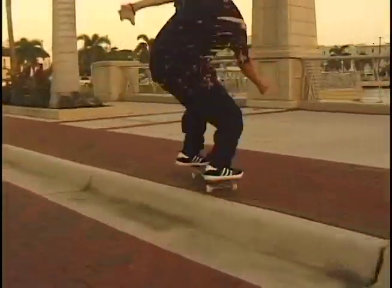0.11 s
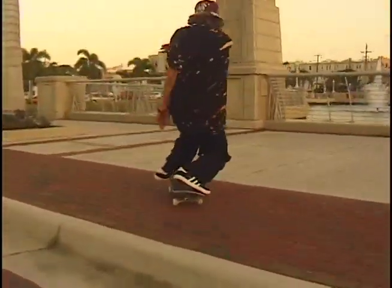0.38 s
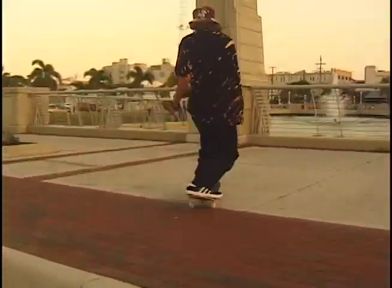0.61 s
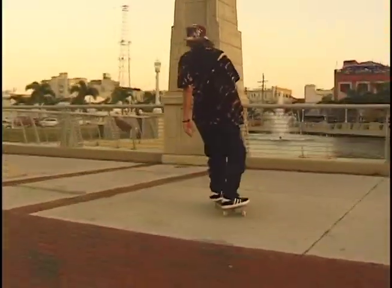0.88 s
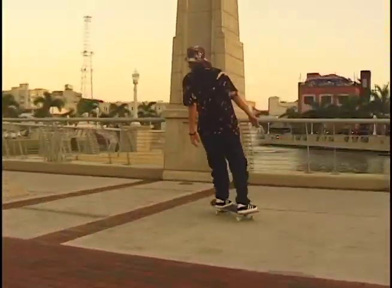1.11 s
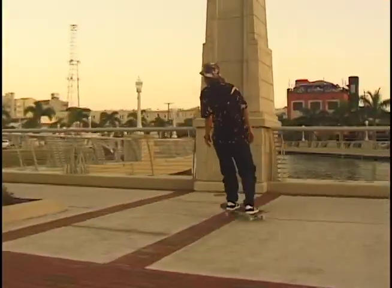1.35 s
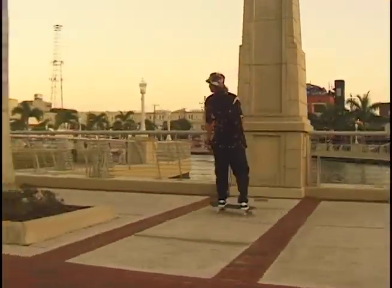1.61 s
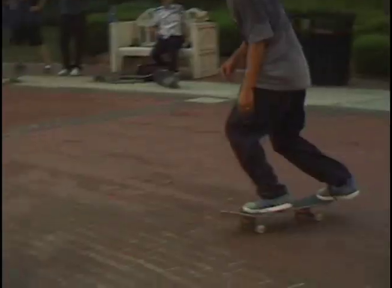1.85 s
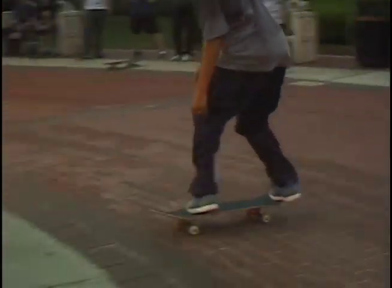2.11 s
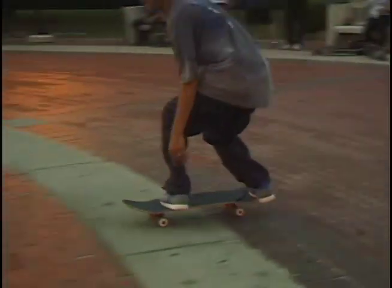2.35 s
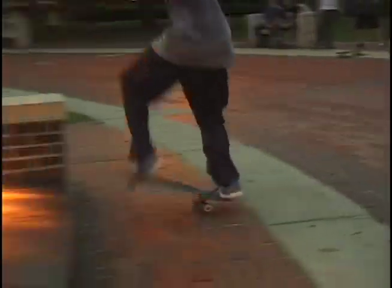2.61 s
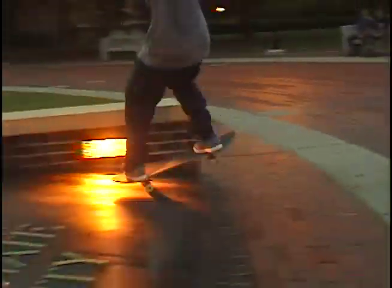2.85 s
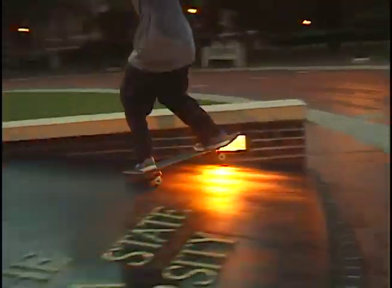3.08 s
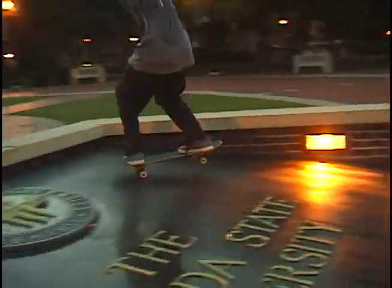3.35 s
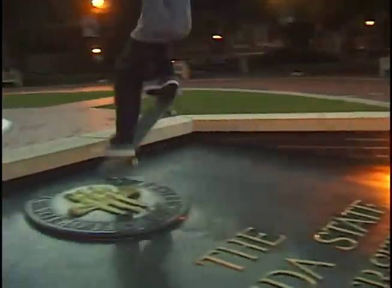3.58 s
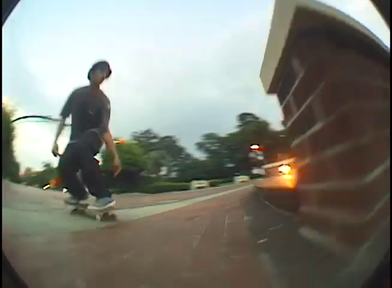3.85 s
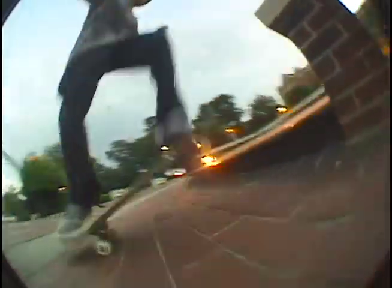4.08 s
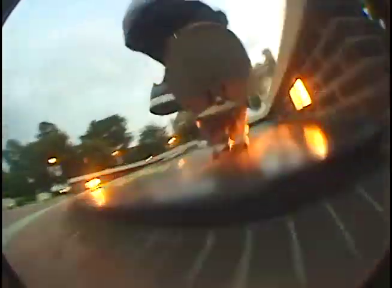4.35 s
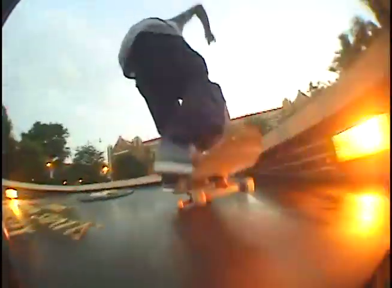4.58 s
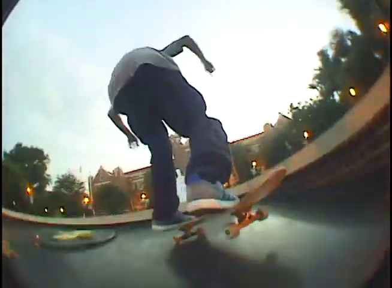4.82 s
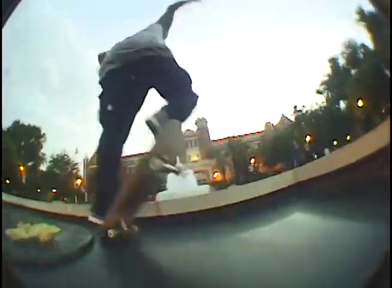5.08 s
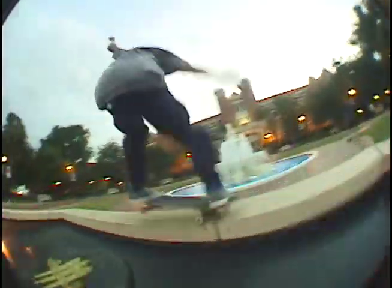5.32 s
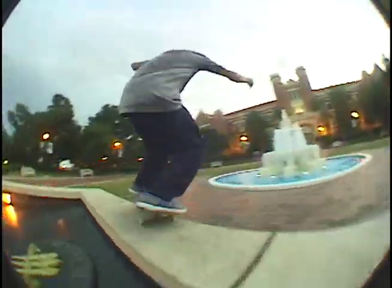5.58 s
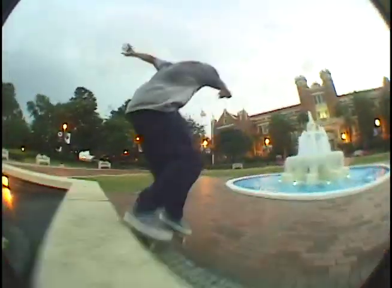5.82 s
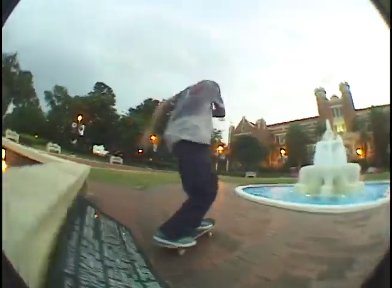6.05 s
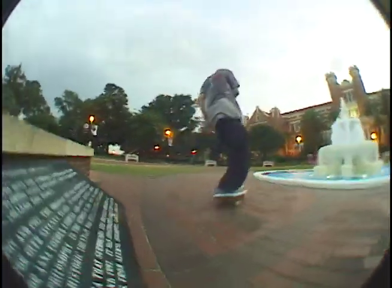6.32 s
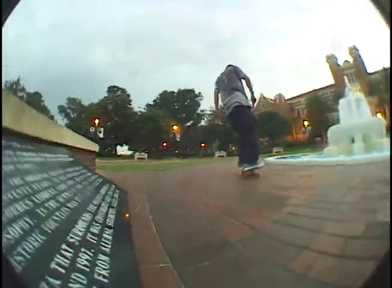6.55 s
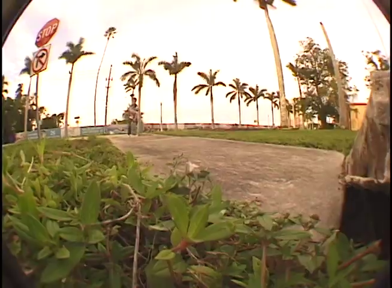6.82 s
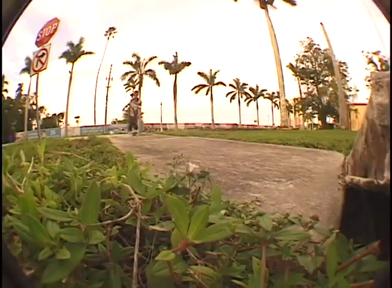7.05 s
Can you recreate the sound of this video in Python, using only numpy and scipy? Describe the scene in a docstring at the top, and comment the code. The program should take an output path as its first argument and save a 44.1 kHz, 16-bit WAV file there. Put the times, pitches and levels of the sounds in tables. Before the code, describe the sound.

Hard wooden skateboard cracks punctuate rolling wheel rumble, seam ticks, rapid brick clatter and short shoe scuffs in an open, lightly windy plaza.

```python
"""Skateboards on a paved square

Wheels rumble on rough ground and knock over joints; tails pop, boards land and shoes scuff. Noise pulses and
damped tones excite the resonances of two decks, the first of which fades into the second. Shaped noise makes
the street, the hissing fountain and the wind that buffets the microphone. The hardest peaks saturate.
Only the last part is in stereo: the board leads on the left, most of the background is partly correlated.
"""
import sys
import numpy as np
from scipy import signal
from scipy.fft import rfft, irfft, next_fast_len
from scipy.io import wavfile
from scipy.ndimage import uniform_filter1d, map_coordinates

SR = 44100
rng = np.random.default_rng(int(sys.argv[2]) if len(sys.argv) > 2 else 0)


def magnitude_from_level(level_db):
    """Linear magnitude for a level in decibels (20 dB per decade)."""
    exponent = np.asarray(level_db, float) / 20
    return 10 ** exponent


def transcribe(signal):
    """Save signal, clipped to [-1, 1], as a 16-bit WAV file at the path in sys.argv[1]."""
    frames = np.atleast_2d(signal).T
    limited = np.clip(frames, -1, 1)
    pcm = np.round(limited * 32767).astype(np.int16)
    wavfile.write(sys.argv[1], SR, pcm)


N = 316638
TIME_S = np.arange(N) / SR

# Levels of separate events are nominal; each layer adds its own offset.
# single deep joints: [t/s, level/dB, knock f/Hz, treble level/dB re the level]
JOINTS = [(1.833, -10.5, 940, -10.5), (1.857, -10, 900, -23), (1.876, -7, 1010, -12.5),
          (1.903, -12, 790, -15), (1.999, -11, 650, -8), (2.278, -8.5, 655, -12), (2.309, -8, 720, -23),
          (1.976, -8.5, 1220, -11.5), (2.067, -19, 930, -0.5), (2.195, -6.5, 787, -12.5),
          (2.226, -9, 746, -13.5), (2.25, -6.5, 680, -30), (2.332, -5.5, 714, -14.5),
          (2.391, -6.5, 930, -7.5), (2.4435, -2.5, 1225, -11), (2.488, -12, 710, -17),
          (2.583, -5.5, 730, -20), (2.646, -18, 640, -17), (3.746, -15.5, 692, -17.5),
          (3.775, -13, 666, -18), (3.797, -12, 643, -10.5), (3.862, -9.5, 837, -19.5),
          (3.916, -3, 718, -20), (3.957, -7, 650, -20.5), (3.983, -13, 695, -6), (3.992, -3.5, 720, -20.5),
          (4.012, -14, 596, -24), (4.035, -13.5, 674, -12), (4.054, -13, 620, -8), (4.062, -8, 584, -23),
          (4.085, -13, 480, -11.5), (4.128, -11, 508, -40), (4.138, -24.5, 517, -8.5)]
# runs over evenly laid bricks: [first t/s, last t/s, first level/dB, last level/dB, knock f/Hz, click level/dB]
BRICK_RUNS = [(1.636, 1.76, -20, -13.5, 634, -28.5), (1.804, 2.097, -9, -18, 600, -23),
              (2.171, 2.334, -11.5, -5, 672, -23.5), (2.485, 2.61, -13, -14.5, 740, -30.5),
              (6.291, 6.758, -38, -38.5, 910, -55)]
# first board crossing seams in the paving: [t/s, level/dB]
SEAMS = [(0.926, -4), (0.954, -9), (0.984, -4.5), (1.011, -5), (1.035, -13), (1.061, -11), (1.09, -1),
         (1.121, -4), (1.146, -12), (1.171, -3), (1.203, -3.5), (1.253, -7.5), (1.305, -3.5), (1.397, -8),
         (1.458, -6.5), (1.554, -4)]
# pops, landings and bounces: [t/s, level/dB, truck clack/dB re level, treble/dB re level, contact length/s]
BLOWS = [(0.109, 10.5, -2.5, -7.5, 0.026), (0.122, 0.5, 8.5, 1.5, 0.011), (0.143, -17, -1, 7, 0.011),
         (0.151, -6, -14, -2, 0.014), (2.702, -15.5, -0.5, -5.5, 0.098), (2.851, 4.5, -0.5, -10, 0.044),
         (2.874, -4.5, -6, -28, 0.033), (3.547, -11.5, -19, -18, .02), (3.56, -16, 13.5, -24, 0.031),
         (3.595, 0.5, 4, -40, 0.035), (4.322, 5.5, -3, -10, 0.042), (4.34, -5, -15, -17, 0.044),
         (4.359, -18.5, 3.5, -11, 0.036), (4.377, -22.5, 4, -3, 0.036), (4.412, -34, -2, 2, .02),
         (4.981, -21.5, -5, -3, 0.017), (5.1046, -12, 10.5, -29, 0.02), (5.127, -37.5, 12.5, 9.5, 0.15),
         (5.348, -18, -4, -12, 0.065), (5.369, 4, -1.5, -11.5, 0.025), (5.421, 0, 3, 2.5, 0.017),
         (5.547, -26, 3, 1, 0.015), (5.561, -10.5, -17, -10, 0.022), (5.792, -6, -12.5, -11, 0.021),
         (5.81, -17.5, -7, -7, 0.039), (5.891, -12.5, 15.5, -28, 0.019), (5.897, -3.5, 0, -32, 0.03),
         (5.929, -12, -19, -15, 0.021), (5.953, -9, -26, -6.5, 0.023), (5.962, 2.5, -22, -12, 0.013),
         (6.028, -20, -22, -11, 0.063), (6.055, 2.5, 9.5, -16, 0.021), (6.186, -29, 2, -2, 0.028),
         (6.304, -30, -3, 4, 0.018), (6.949, -20.5, 19, 3, 0.046), (6.962, -20, 12.5, 13, 0.013),
         (6.986, -31, 14, 13, 0.031), (6.997, -32.5, 12, 14, 0.027), (7.086, 0.5, -5, -3.5, 0.032),
         (7.112, -27, 15.5, 5, 0.041), (7.128, -7.5, -13, -2.5, 0.035)]
# the note that stands out of a hard blow, set by the spot that is struck: [t/s, level/dB, f/Hz]
BLOW_NOTES = [(0.109, 6, 980), (2.709, -9.5, 1054), (2.851, -1.5, 764), (3.594, -5, 2190),
              (4.322, -0.5, 1106), (5.106, -11.5, 743), (5.371, -0.5, 527), (5.423, -5, 547),
              (5.891, -9.5, 1585), (6.054, 2, 1483), (6.953, -4, 3400), (7.088, -5.5, 464)]
# shoes and tail dragging: [start t/s, end t/s, level/dB]
SCUFFS = [(0.152, 0.198, -27.5), (3.568, 3.588, -23.5), (4.142, 4.19, -34), (5.105, 5.158, -30),
          (5.383, 5.45, -28), (5.567, 5.587, -26), (5.795, 5.847, -34.5), (5.895, 5.967, -35),
          (6.05, 6.1, -35), (6.983, 7.02, -35), (7.082, 7.173, -22.5)]
# soft low bumps of the wheels on smooth stone and far bricks: [t/s, level/dB, f/Hz]
BUMPS = [(3.509, -22, 414), (3.715, -21, 485), (4.4, -18.5, 234), (4.57, -24, 272), (4.6, -22.5, 216),
         (4.75, -23, 101), (4.768, -18.5, 345), (4.927, -25, 102), (4.957, -25, 202), (5.048, -24, 121),
         (5.086, -23, 282), (5.919, -19, 479), (5.99, -15.5, 441), (6.127, -27, 304), (6.179, -26, 338),
         (6.199, -23, 369), (6.226, -23, 299), (6.25, -17.5, 506), (6.269, -21, 344), (6.36, -27, 339),
         (6.409, -25.5, 293), (6.531, -27, 273), (6.637, -27, 316), (6.711, -24, 528)]
# the whole deck flexing after a hard load: [t/s, level/dB, f/Hz]
FLEXES = [(2.884, -17.5, 94.5), (3.988, -11.5, 118), (4.058, -24, 102), (4.118, -21.5, 94),
          (4.323, -3, 247)]

# modes of the first deck with its trucks: [f/Hz, width/Hz, level/dB]
FIRST_DECK = [(157, 50, -6.5), (213, 95, 0), (298.6, 54, 3.5), (422, 128, -2.5), (578, 105, 2.5),
              (740, 65, -4), (1160, 470, -13.5)]
# modes of the second deck, which also serve every joint and blow: [f/Hz, width/Hz, level/dB]
SECOND_DECK = [(121, 22, -1.5), (207, 170, -10), (285, 280, -1.5), (505, 86, 3), (689, 304, 4.5),
               (1193, 196, -2.5), (1470, 170, -7), (1722, 936, -10), (2420, 294, -16), (2900, 500, -31.5)]
# resonances of the first board's spinning wheels: [f/Hz, width/Hz, relative level/dB]
BEARINGS = [(3100, 1150, 13), (4620, 970, 13.5)]
# the rider leans into the turn and the first deck's hollow mode opens: [t/s, level/dB]
HOLLOW_LEVEL = [(.4, -2), (.75, -2), (.95, 1.5), (1.2, 6.5), (1.35, 1.5)]

# relative spectra of wind, street, fountain spray and fine fountain mist: [f/Hz, level/dB]
BUFFET_SPECTRUM = [(15, -42), (35, -1.5), (70, -1), (110, 1), (200, -1.5), (500, -9), (1000, -42)]
WASH_SPECTRUM = [(100, -21), (200, -19), (500, 15), (900, 18.5), (1500, 16), (2500, 11), (3300, 8),
                 (4500, 6.5), (6000, -27)]
SPRAY_SPECTRUM = [(2500, -40), (3500, -17), (4500, 5.5), (5500, 9), (7500, 6), (9500, 3), (11000, -39),
                  (12500, -50)]
MIST_SPECTRUM = [(7500, -7.5), (9500, 5), (10500, 2.5), (12000, -6), (13500, -2.5), (15000, -35),
                 (15600, -30)]
# relative spectra of hard cracks and of gritty shoe friction: [f/Hz, level/dB]
CRACK_SPECTRUM = [(2060, -32.5), (3500, 5), (3990, -0.5), (4930, 1.5), (10500, -8.5), (13900, -20),
                  (15500, -69)]
SCUFF_SPECTRUM = [(180, -7), (300, 6.5), (891, 1), (1370, -3), (1780, -4), (4560, -6.5), (9750, -18),
                  (15500, -42)]

# levels of wheel rumble, wind and street: [t/s, level/dB]
ROLL_LEVEL = [(0, -22.5), (.3, -16.5), (.54, -14), (.88, -15), (1.12, -20), (1.36, -23.5), (1.68, -18.5),
              (2.0, -28), (2.26, -37), (2.52, -26), (2.66, -33), (2.88, -69), (3.6, -60), (3.72, -35.5),
              (3.94, -34), (4.0, -23), (4.1, -34.5), (4.18, -42), (5.041, -44), (5.3, -70), (5.82, -60),
              (5.96, -39.5), (6.5, -58), (6.775, -62), (6.79, -35), (6.96, -41), (7.18, -38)]
WIND_LEVEL = [(0, -39), (.3, -39), (1.5, -34), (2.0, -31.5), (2.35, -28.5), (2.66, -39.5), (3.45, -43.5),
              (3.75, -42), (3.94, -33), (4.12, -34), (4.2, -44), (4.35, -48), (4.68, -41.5), (4.76, -36.5),
              (5.04, -39.5), (5.58, -52), (6.1, -47.5), (6.3, -38.5), (6.55, -53.5), (6.775, -47),
              (6.79, -33), (6.96, -35.5), (7.1, -46)]
STREET_LEVEL = [(0, -40.5), (.3, -41), (.54, -29), (.66, -40.5), (1.12, -41), (1.68, -34.5), (2.26, -29),
                (2.4, -36.5), (2.88, -36), (3.24, -39), (3.72, -36.5), (3.84, -43), (4.66, -46), (4.8, -83),
                (4.92, -59), (5.04, -43), (5.96, -43), (6.46, -45), (6.96, -41), (7.18, -41)]
# fountain: [t/s, spray level/dB, mist level/dB]
FOUNTAIN_LEVEL = [(0, -43, -46), (.3, -46.5, -52), (.58, -44, -45), (.86, -49.5, -54.5), (1.3, -48.5, -51),
                  (1.8, -33.5, -40.5), (2.26, -32, -41.5), (2.4, -35.5, -44), (2.66, -33.5, -45),
                  (3.05, -40, -47.5), (3.6, -43, -42.5), (3.84, -48, -50), (4.0, -44.5, -51),
                  (4.14, -40.5, -40), (4.32, -57, -63), (4.52, -54, -51.5), (4.66, -54, -53),
                  (4.8, -59, -62), (5.25, -43.5, -51.5), (5.8, -56.5, -52.5), (6.46, -47, -50.5),
                  (6.96, -47.5, -53.5), (7.1, -56, -63)]
# left-right likeness of rumble, street and wind in the stereo part: [f/Hz, likeness from 0 to 1]
LIKENESS = [(60, .1), (130, 1), (600, 0.5), (3000, 0.07)]

SWAP_START_S, SWAP_END_S = 1.69, 1.786  # the first deck fades into the second
STEREO_S = 6.786
LEAD_S = 55e-6  # the board reaches the left port first
BRICK_S = 0.025  # nominal time from joint to joint
UNEVEN_S, UNEVEN_DB, UNEVEN_OCTAVES = 0.002, 2, 0.35  # standard deviations over a brick run
RING_DB, RING_FOLLOWS = 6, 0.71  # nose and tail ring more when the contact is brighter
STANCE_OCTAVES, STANCE_DB = 0.08, 2  # each blow finds the deck loaded differently
DAMPED = 2.0  # feet and ground widen the modes by this factor


def unit(x):
    """Normalises to a root-mean-square value of 1."""
    return x / np.sqrt(np.mean(x ** 2) + 1e-20)


def along(points, hz):
    """Interpolates (f, value) points along a logarithmic frequency axis."""
    f, value = np.transpose(points)
    return np.interp(np.log(hz + 1), np.log(f + 1), value)


def filtered(x, response):
    """Linear filtering: the spectrum is multiplied by a complex response of frequency."""
    n = np.shape(x)[-1]
    padded = next_fast_len(n + SR // 4)
    hz = np.fft.rfftfreq(padded, 1 / SR)
    return irfft(rfft(x, padded) * response(hz), padded)[..., :n]


def coloured(x, spectrum):
    """Spectral shaping by the levels of a (f, level) table."""
    return filtered(x, lambda hz: magnitude_from_level(along(spectrum, hz)))


def resonant(x, modes):
    """Modal superposition: band-pass resonances, each applied twice so that the valleys stay dark."""
    def response(f):
        return sum(magnitude_from_level(db) * (1j * f * width / (centre ** 2 - f ** 2 + 1j * f * width)) ** 2
                   for centre, width, db in modes)
    return filtered(x, response)


def wobble(rate):
    """Slow random modulation: a smooth curve through rate random knots a second."""
    knots = rng.standard_normal(int(N * rate / SR) + 4)
    return map_coordinates(knots, [np.arange(N) * rate / SR])


def ramp(t0, t1):
    """Linear transition from 0 before t0 to 1 after t1."""
    return np.interp(TIME_S, [t0, t1], [0, 1])


def curves(rows):
    """Piecewise linear envelopes, one for each column after the time."""
    s, *columns = np.transpose(rows)
    return [np.interp(TIME_S, s, column) for column in columns]


def bursts(times, db, attack, life, shape):
    """Impact envelopes: fast rise, 60 dB down after life seconds; shape over 1 holds, then drops."""
    envelope, t = np.zeros(N + SR), np.arange(SR // 4) / SR
    for s, level, length in np.broadcast(times, db, life):
        decay = magnitude_from_level(level - 60 * (t / length) ** shape)
        envelope[round(s * SR):][:len(t)] += decay * (1 - np.exp(-t / attack))
    return envelope[:N]


def rings(times, db, hz, attack, t60):
    """Free vibration: one softly started, exponentially damped tone for each contact."""
    out, t = np.zeros(N + SR), np.arange(SR // 4) / SR
    for s, level, f, life in np.broadcast(times, db, hz, t60):
        envelope = magnitude_from_level(level - 60 * t / life) * (1 - np.exp(-t / attack))
        out[round(s * SR):][:len(t)] += envelope * np.sin(2 * np.pi * f * t)
    return out[:N]


def crack_noise():
    """Broadband radiation of hard contacts: bright noise of rms 1."""
    return unit(coloured(rng.standard_normal(N), CRACK_SPECTRUM))


def rush(spectrum, patchy_db):
    """Turbulence: noise of rms 1 with random gain in patches of time and frequency."""
    bins = signal.stft(rng.standard_normal(N), nperseg=512)[2]
    field = uniform_filter1d(rng.standard_normal(bins.shape), 6, 0)
    field = unit(uniform_filter1d(field, 12, 1))
    noise = signal.istft(bins * magnitude_from_level(patchy_db * field), nperseg=512)[1][:N]
    return unit(coloured(noise, spectrum))


def wind():
    """Pressure fluctuation at the microphone: low noise modulated by gusts."""
    (level_db,) = curves(WIND_LEVEL)
    gusts = magnitude_from_level(1.0 * wobble(7.5))
    return magnitude_from_level(level_db) * unit(gusts * rush(BUFFET_SPECTRUM, patchy_db=1.5))


def street():
    """Diffuse street sound as a wash of shaped noise."""
    (level_db,) = curves(STREET_LEVEL)
    return magnitude_from_level(level_db) * rush(WASH_SPECTRUM, patchy_db=1.5)


def fountain():
    """Water noise as the sum of two bands: spray and, higher up, mist."""
    spray_db, mist_db = curves(FOUNTAIN_LEVEL)
    mist = rush(MIST_SPECTRUM, patchy_db=1.5)
    return magnitude_from_level(spray_db) * rush(SPRAY_SPECTRUM, patchy_db=2.0) + magnitude_from_level(mist_db) * mist


def deck(force):
    """Forced vibration: the modes of the deck under way turn force into sound."""
    swap = ramp(SWAP_START_S, SWAP_END_S)
    first = force * (1 - swap)
    (hollow_db,) = curves(HOLLOW_LEVEL)
    steady = resonant(first, FIRST_DECK[:4] + FIRST_DECK[5:])
    hollow = resonant(first * magnitude_from_level(hollow_db), FIRST_DECK[4:5])
    return steady + hollow + resonant(force * swap, SECOND_DECK)


def rolling():
    """Roughness excitation: dense jolts and stray grit shake the deck; the first board's bearings sing."""
    (level_db,) = curves(ROLL_LEVEL)
    swap = ramp(SWAP_START_S, SWAP_END_S)
    jolts = rng.standard_normal(N) * magnitude_from_level(1.1 * wobble(40) + 2.5 * wobble(200))
    grains = (rng.random(N) < 60 / SR) * rng.laplace(0, 16, N)  # on average 60 a second
    grit = uniform_filter1d(grains * (0.15 + swap), size=24)  # soft wheels round each grain
    rumble = magnitude_from_level(level_db) * unit(deck(jolts + grit))
    bearings = unit(resonant(rng.standard_normal(N), BEARINGS)) * (1 - swap)
    flicker = magnitude_from_level(2 * wobble(60) + 1.5 * wobble(8))
    bearings_db = -44.5 + 2.2 * (TIME_S > 0.72)  # a step up at 0.72 s
    return rumble + magnitude_from_level(bearings_db) * flicker * bearings


def grit_ticks():
    """Brittle fracture: small stones crack under the first board's wheels just after it lands."""
    when, size = rng.random((14, 2)).T
    ticks = bursts(0.28 + 0.47 * when, -44 + 7 * size, attack=0.00029, life=0.024, shape=4.2)
    return crack_noise() * ticks


def bumps():
    """Damped vibration: a push dies in about six cycles, a flexing deck booms for about twenty."""
    s, db, hz = np.transpose(BUMPS)
    push = -rings(s, db + 4.5, hz, attack=0.0014, t60=6.1 / hz)
    s, db, hz = np.transpose(FLEXES)
    return push + rings(s, db, hz, attack=0.0047, t60=21 / hz)


def scuffs():
    """Friction noise: gritty sliding swells at once and fades as the shoe lifts to a faint residue."""
    stroke = 0
    for start, end, db in SCUFFS:
        knots = [start, start + 0.0054, (start + end) / 2, end + 0.019]
        stroke = stroke + magnitude_from_level(db) * np.interp(TIME_S, knots, [0.0081, 0.94, 0.9, 0.016])
    grit = rng.standard_normal(N) * magnitude_from_level(3.5 * wobble(300) + 2.5 * wobble(90))
    return stroke * unit(coloured(grit, SCUFF_SPECTRUM))


def seams():
    """Impulse response: each seam gives the first deck one short jolt and the wheels a tick."""
    s, db = np.transpose(SEAMS)
    jolt = resonant(-bursts(s, db + 15, attack=0.00015, life=0.0021, shape=0.95), FIRST_DECK)
    return jolt + crack_noise() * bursts(s, db - 35, attack=0.0005, life=0.018, shape=1.1)


def brick_runs():
    """Near-periodic excitation: slightly uneven rows as in JOINTS, leaving deep joints their place."""
    rows = []
    for first, last, first_db, last_db, hz, click_db in BRICK_RUNS:
        count = round((last - first) / BRICK_S) + 1
        late, strong, high = rng.standard_normal((count, 3)).T
        s = np.linspace(first, last, count) + UNEVEN_S * late
        db = np.linspace(first_db, last_db, count) + UNEVEN_DB * strong
        rows += zip(s, db, hz * 2 ** (UNEVEN_OCTAVES * high), click_db - db)
    deep = np.array(JOINTS)[:, 0]
    return [row for row in rows if np.abs(deep - row[0]).min() > BRICK_S / 2]


def joints():
    """Impact excitation: a joint knocks at a stance-set pitch, jolts and rattles the deck, clicks wheels."""
    s, db, hz, treble_db = np.transpose(JOINTS + brick_runs())

    def shake(level_db):
        return rng.standard_normal(N) * bursts(s, level_db, attack=0.00033, life=0.012, shape=1.14)

    far_edge = bursts(s + 0.0009, db + 13.0, attack=0.0001, life=0.00058, shape=1.07)
    edge = resonant(far_edge, SECOND_DECK[4:9])
    knock = rings(s, db + 1.5, hz, attack=0.00036, t60=0.031)
    hollow = resonant(shake(db + 14.5), SECOND_DECK[1:5])
    upper_db = RING_DB + RING_FOLLOWS * treble_db
    upper = resonant(shake(db + upper_db + 23.5), SECOND_DECK[5:])
    click = bursts(s - 0.002, db + treble_db + 4.0, attack=0.0018, life=0.031, shape=1.037)
    return knock + hollow + upper + edge + crack_noise() * click


def blows():
    """Modal impact: the ground thuds, the deck rings, the trucks clack, the contact cracks."""
    s, db, clack_db, treble_db, length = np.array(BLOWS).T
    length = np.clip(length, 0.008, 0.2)
    t = np.arange(SR // 5) / SR
    level = db[:, None]  # one row of samples for each blow

    def force(level_db, attack):
        decay = magnitude_from_level(level_db - 60 * (t / length[:, None]) ** 1.064)
        return rng.standard_normal((len(s), len(t))) * decay * (1 - np.exp(-t / attack))

    modes = []
    for hz, width, mode_db in SECOND_DECK:
        pitch, gain = rng.standard_normal((2, len(s), 1))
        modes.append((hz * 2 ** (STANCE_OCTAVES * pitch), DAMPED * width, mode_db + STANCE_DB * gain))
    thud = resonant(force(level + 5, attack=0.0013), modes[:3])
    ring = resonant(force(level + 7.5, attack=0.0013), modes[3:7])
    clack = resonant(force(level + clack_db[:, None] + 18.5, attack=0.0022), modes[7:])
    touch = resonant(magnitude_from_level(level + 10.5 - 60 * t / 0.00049), modes[5:])  # the first instant of contact
    out = np.zeros(N + SR)
    for start, blow in zip(s, thud + ring + clack + touch):
        out[round(start * SR):][:len(t)] += blow
    crack = crack_noise() * bursts(s, db + treble_db - 0.5, attack=0.002, life=length, shape=1.074)
    s, db, hz = np.transpose(BLOW_NOTES)
    return out[:N] + crack + rings(s, db, hz, attack=0.0018, t60=0.038)


def widen(board, around):
    """Interaural cues: at the end the board leads on the left and the background is partly correlated."""
    last = ramp(STEREO_S - 0.001, STEREO_S)

    def lead(hz):
        return np.exp(np.outer([1j, -1j], np.pi * hz * LEAD_S))

    def angle(hz):
        return np.arccos(np.clip(along(LIKENESS, hz), 0, 1)) / 2

    def scattered(hz):
        phase = np.cumsum(rng.normal(0, 0.03, len(hz)))
        return np.sin(angle(hz)) * np.exp(1j * phase)

    near = filtered(board * last, lead)
    mid = filtered(around * last, lambda hz: np.cos(angle(hz)))
    side = filtered(around * last, scattered) * last
    balance = magnitude_from_level([[1.3], [-1.3]])  # the left is stronger
    stereo = balance * (near + np.array([mid + side, mid - side]))
    return (board + around) * (1 - last) + stereo


def scene():
    """Superposition of fountain, street, wind and boards; the fountain is the same in both channels."""
    water = fountain()
    around = wind() + street() + rolling()
    board = grit_ticks() + bumps() + scuffs() + seams() + joints() + blows()
    return widen(board, around) + water


def top_cut(x):
    """Nothing passes above the cut-off."""
    return signal.sosfilt(signal.butter(12, 15620, fs=SR, output="sos"), x)


def record(dry):
    """Transducer limits: first-order bass loss, saturation of the hardest blows and a finite bandwidth."""
    low_cut_hz, roll_off_hz, top_hz = 64, 15200, 15600
    thinned = filtered(dry, lambda hz: 1j * hz / (low_cut_hz + 1j * hz))
    clipped = thinned / (1 + np.abs(thinned / 0.99) ** 12) ** (1 / 12)
    mix = filtered(clipped, lambda hz: (hz < top_hz) / (1 + (hz / roll_off_hz) ** 12))
    return top_cut(mix)


dry = scene()
out = record(dry)
transcribe(out)
```